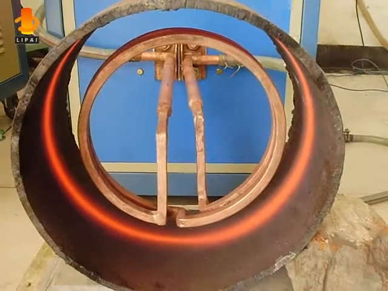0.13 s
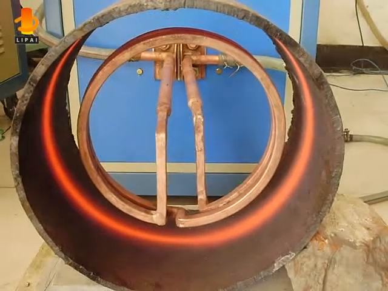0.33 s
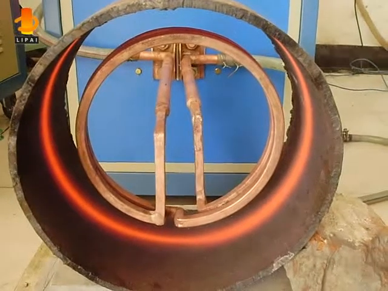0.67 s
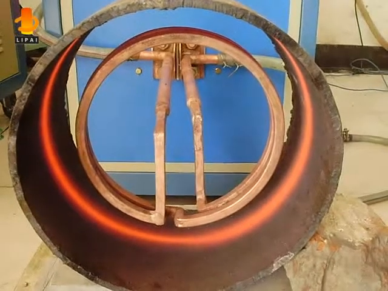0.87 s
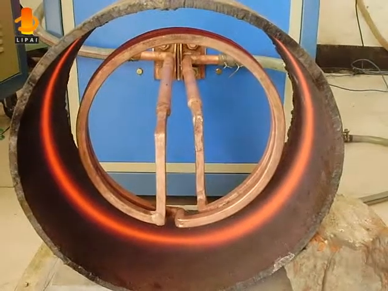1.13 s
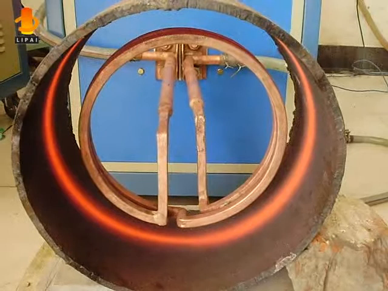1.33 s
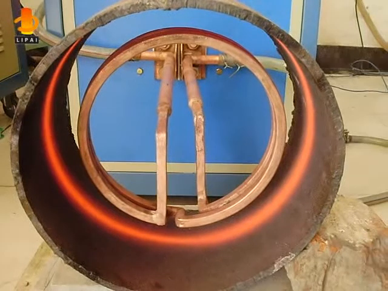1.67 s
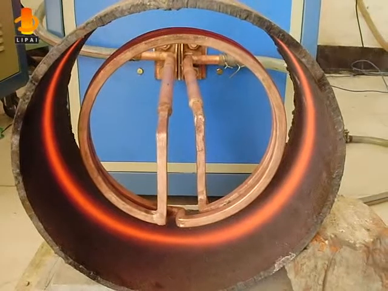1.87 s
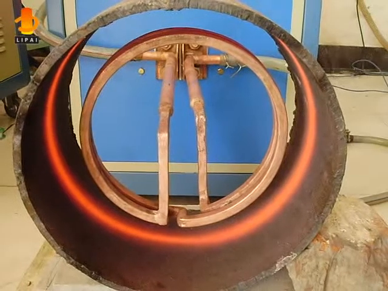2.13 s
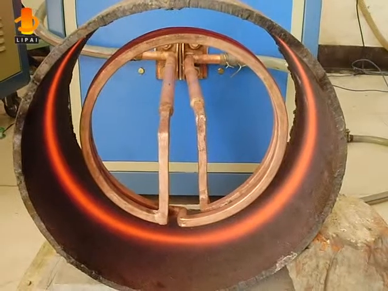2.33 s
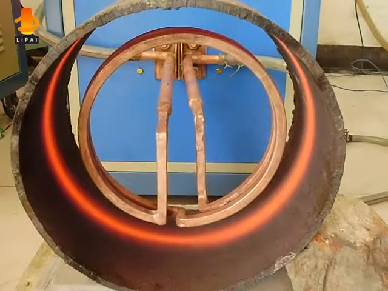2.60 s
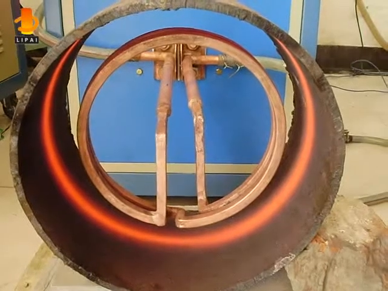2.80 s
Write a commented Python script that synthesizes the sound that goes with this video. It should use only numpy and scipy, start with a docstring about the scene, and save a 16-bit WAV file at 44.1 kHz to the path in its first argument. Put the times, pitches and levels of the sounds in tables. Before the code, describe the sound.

Close to the coil in a workshop, an induction heating machine whines continuously with a rapid flutter. Behind the whine, transformers hum, cooling fans rush and a low motor drone gently swells and sinks. One tiny click comes midway.

```python
"""An induction coil heats a steel pipe in a workshop, its supply whining at 900 Hz.
Two side tones make the whine throb; transformer and chokes hum on other mains multiples.
Cooling fans and a pump add wavering motor tones and rushing air, which stirs cabinet and
pipe resonances. Their low drone swells and sinks; one tiny click sounds midway."""
import sys
import numpy as np
from scipy import signal
from scipy.fft import rfft, irfft
from scipy.io import wavfile

SR = 44100
rng = np.random.default_rng(int(sys.argv[2]) if len(sys.argv) > 2 else 0)


def pcm_store(signal):
    """Save signal as 16-bit PCM."""
    levels = np.round(np.clip(np.atleast_2d(signal), -1, 1) * 32767)
    wavfile.write(sys.argv[1], SR, levels.astype(np.int16).T)


N = 131418
TIME_S = np.arange(N) / SR
BINS_HZ = np.maximum(np.arange(N // 2 + 1) * SR / N, 1e-3)

MAINS_HZ, WHINE_HZ, THROB_HZ = 50, 900, 42.45
PUMP_HZ, FAN_HZ = 217.3, 143.4
SUPPLY_FLUTTER_HZ, MOTOR_WAVER_HZ = 17, 5.5

# whine centre tone: (time [s], level [dB])
WHINE_LEVEL = [(0, -17.5), (.12, -23), (.27, -21), (.38, -19), (.5, -22.5), (.6, -23), (.68, -20.5),
               (.77, -25), (1.0, -20.5), (1.1, -26.5), (1.18, -19), (1.28, -23.5), (1.38, -22), (1.9, -20),
               (1.99, -18.5), (2.08, -22.5), (2.3, -20.5), (2.75, -21), (2.87, -20), (2.98, -20.5)]
# centre tone dips: (time [s], depth [0-1], half width [s])
WHINE_DIPS = [(0.055, 0.42, 0.05), (0.319, 0.73, 0.018), (1.225, 0.6, 0.012), (1.768, 0.6, 0.015),
              (1.951, 1, 0.014), (2.04, 1, 0.013), (2.144, 0.34, 0.028), (2.808, 0.87, 0.01)]
# lower side tone, sets throb depth: (time [s], level [dB])
LOWER_SIDE_LEVEL = [(0, -24), (.1, -26), (.2, -31), (.43, -27), (.55, -32.5), (.65, -24), (.74, -30),
                    (.83, -27), (1.25, -25.5), (1.33, -23), (1.42, -36.5), (1.5, -29), (1.62, -27),
                    (1.85, -29.5), (1.97, -38), (2.12, -26.5), (2.45, -30.5), (2.72, -30.5), (2.8, -23.5),
                    (2.98, -34)]
# supply hum: (mains multiple [-], level [dB])
HUM_PARTIALS = [(2, -51.5), (6, -42), (12, -47.5), (14, -48), (16, -50.5), (20, -49), (24, -38),
                (26, -56.5), (30, -53), (32, -48), (36, -53.5), (44, -63.5), (50, -62.5), (52, -64.5),
                (194, -101), (230, -102), (264, -110)]
# pump tone: (time [s], level [dB])
PUMP_LEVEL = [(0, -50), (.35, -45), (.5, -41.5), (1.08, -39), (1.18, -47), (1.3, -38), (1.6, -41.5),
              (1.72, -47), (1.85, -38.5), (2.22, -38.5), (2.32, -45.5), (2.44, -35), (2.62, -45),
              (2.98, -45)]
# lowest fan tone: (time [s], level [dB])
FAN_LEVEL = [(0, -49.5), (.85, -48.5), (1.0, -40.5), (1.12, -46.5), (1.25, -40), (1.42, -50), (1.76, -40),
             (1.9, -47.5), (2.7, -49.5), (2.87, -39.5), (2.98, -45)]
# higher fan tones: (frequency [Hz], level [dB], flutter [ratio])
FAN_TONES = [(350.7, -41, 0.37), (555.4, -51, .5), (636, -43, 0.96), (794, -43, 0.43), (953, -48, 0.57),
             (1145, -50, 0.56)]
# air rush: (frequency [Hz], density [dB/Hz])
AIR_SPECTRUM = [(15, -70.5), (42, -70), (75, -68), (120, -63), (250, -63), (560, -62), (770, -60),
                (930, -55), (1050, -63), (1170, -61.5), (1260, -69.5), (1700, -72.5), (2280, -68),
                (2800, -73.5), (3300, -76.5), (3700, -81), (4000, -90), (4400, -91.5), (5000, -108)]
# cabinet and pipe: (frequency [Hz], width [Hz], level [dB])
RESONANCES = [(177.5, 7.3, -49.5), (301.2, 28, -36.5), (343.3, 36, -41), (420.8, 32, -39.5), (505, 5, -50),
              (733, 24, -43.5), (791.5, 25, -42), (839.3, 30, -34.5), (892.3, 15, -38), (931, 3.7, -44)]
# low drone swells: (time [s], gain [dB], half width [s])
DRONE_SWELLS = [(0.296, 4, 0.049), (.6, 3.5, .06), (.86, 5, 0.089), (1.18, 5.5, 0.048), (1.562, 1.5, 0.046),
                (1.835, 2, 0.061), (2.1, 4.5, 0.033), (2.56, 2.5, 0.049), (2.822, 2.5, 0.044)]


def from_db(db):
    """Decibels to gain."""
    return 10 ** (np.asarray(db) / 20)


def unit_rms(x):
    """Scale to rms 1."""
    return x / np.sqrt(np.mean(x ** 2) + 1e-20)


def curve(points):
    """Linear interpolation over time."""
    return np.interp(TIME_S, *np.transpose(points))


def bump(at_s, half_width_s):
    """Gaussian pulse, peak 1."""
    return np.exp(-((TIME_S - at_s) / half_width_s) ** 2)


def noise(gain):
    """Noise shaped by a gain per frequency bin."""
    return irfft(rfft(rng.standard_normal(N)) * gain, N)


def drift(rate_hz):
    """Slow random motion, rms 1."""
    return unit_rms(noise(1 / (1 + (BINS_HZ / rate_hz) ** 2)))


def tone(hz, db, flutter, rate_hz=SUPPLY_FLUTTER_HZ, start_cycles=None):
    """Sine with unsteady amplitude and phase; flutter is the random-to-steady rms ratio."""
    if start_cycles is None:
        start_cycles = rng.random()
    phase = 2 * np.pi * (hz * TIME_S + start_cycles)
    unsteady = drift(rate_hz) * np.sin(phase) + drift(rate_hz) * np.cos(phase)
    return from_db(db) * unit_rms(np.sqrt(2) * np.sin(phase) + flutter * unsteady)


def whine(first_throb_s=0.0212):
    """Strongest supply partial, with brief dips; opposed side tones throb its pitch and level."""
    dip_gain = np.prod([1 - depth * bump(at_s, half_s) for at_s, depth, half_s in WHINE_DIPS], axis=0)
    start = rng.random()
    lead = THROB_HZ * first_throb_s
    centre = tone(WHINE_HZ, curve(WHINE_LEVEL), flutter=0.025, start_cycles=start)
    lower = tone(WHINE_HZ - THROB_HZ, curve(LOWER_SIDE_LEVEL), flutter=0.089, start_cycles=start + lead)
    upper = tone(WHINE_HZ + THROB_HZ, db=-42.5, flutter=0.089, start_cycles=start - lead)
    return dip_gain * centre + lower - upper


def supply_hum():
    """Transformer and chokes vibrate on mains multiples."""
    return sum(tone(multiple * MAINS_HZ, db, flutter=0.14) for multiple, db in HUM_PARTIALS)


def motors():
    """Wavering motor tones; the pump and the lowest fan tone swell and sink."""
    pump = tone(PUMP_HZ, curve(PUMP_LEVEL), flutter=0.4, rate_hz=MOTOR_WAVER_HZ)
    low_fan = tone(FAN_HZ, curve(FAN_LEVEL), flutter=0.35, rate_hz=MOTOR_WAVER_HZ)
    high_fans = sum(tone(hz, db, flutter, MOTOR_WAVER_HZ) for hz, db, flutter in FAN_TONES)
    return pump + low_fan + high_fans


def cooling_air(top_hz=5000):
    """Dull, even rush plus the cabinet and pipe resonances it excites."""
    points_hz, points_db = np.transpose(AIR_SPECTRUM)
    density_db = np.interp(np.log(BINS_HZ), np.log(points_hz), points_db)
    lowpass = 1 / np.sqrt(1 + (BINS_HZ / top_hz) ** 100)
    rush = noise(from_db(density_db) * lowpass) * np.sqrt(SR / 2)
    for hz, width_hz, db in RESONANCES:
        detuning = (BINS_HZ ** 2 - hz ** 2) / (BINS_HZ * width_hz)
        ringing = noise(lowpass / (1 + detuning ** 2 / 2))
        rush += from_db(db) * unit_rms(ringing)
    return rush


def swell_drone(machine, low_hz=275, high_hz=380, rest_db=-0.4):
    """One low band of the machine swells about three times a second."""
    band = (BINS_HZ > low_hz) & (BINS_HZ < high_hz)
    drone = irfft(rfft(machine) * band, N)
    swell_db = sum(db * bump(at_s, half_s) for at_s, db, half_s in DRONE_SWELLS)
    return machine - drone + from_db(rest_db + swell_db) * drone


def click(at_s=1.4233, peak_db=-20, decay_s=0.000155):
    """Dry click like an edit splice: a sudden step that dies at once."""
    age_s = TIME_S - at_s
    return -from_db(peak_db) * np.sign(age_s) * np.exp(-np.abs(age_s) / decay_s)


def hiss(level_db=-93.5):
    """Very faint white noise."""
    return from_db(level_db) * rng.standard_normal(N)


def scene():
    """Mono mix, just in front of the coil."""
    noise_floor = hiss()
    machine = swell_drone(supply_hum() + motors() + cooling_air())
    return (whine() + machine + click() + noise_floor)[None]


def record(dry, cutoff_hz=15700, run_in_samples=2000):
    """Steep elliptic low-pass; a mirrored run-in lets it settle."""
    lowpass = signal.ellip(10, 0.1, 80, cutoff_hz, fs=SR, output="sos")
    padded = np.pad(dry, ((0, 0), (run_in_samples, 0)), mode="reflect", reflect_type="odd")
    return signal.sosfilt(lowpass, padded)[:, run_in_samples:]


dry = scene()
out = record(dry)
pcm_store(out)
```